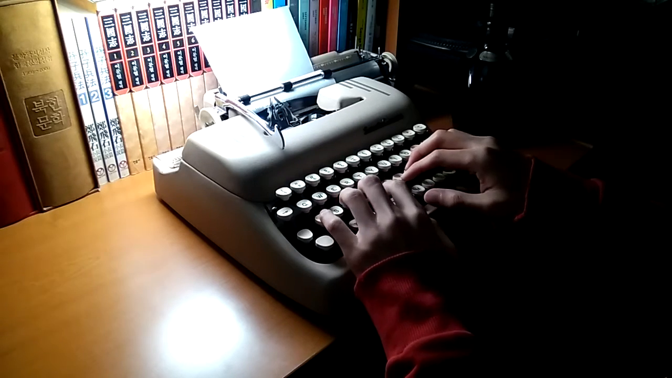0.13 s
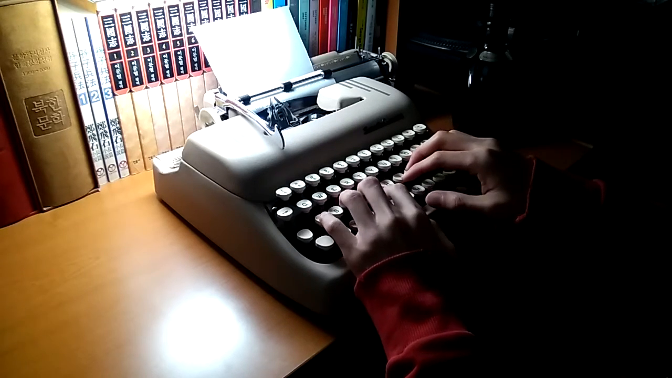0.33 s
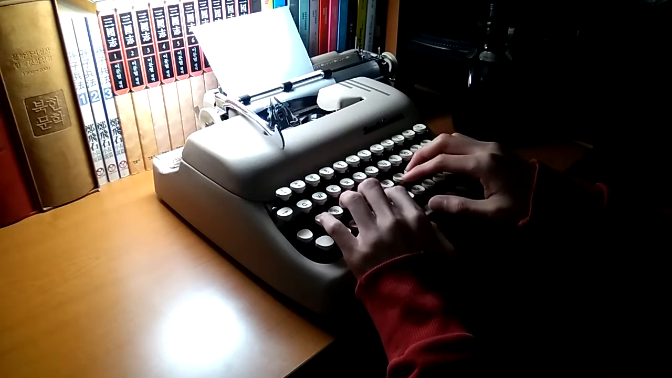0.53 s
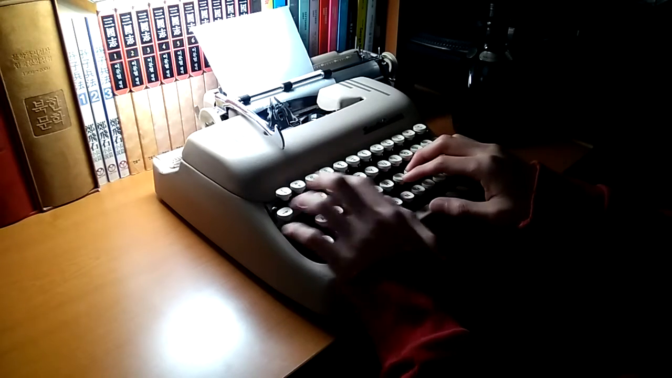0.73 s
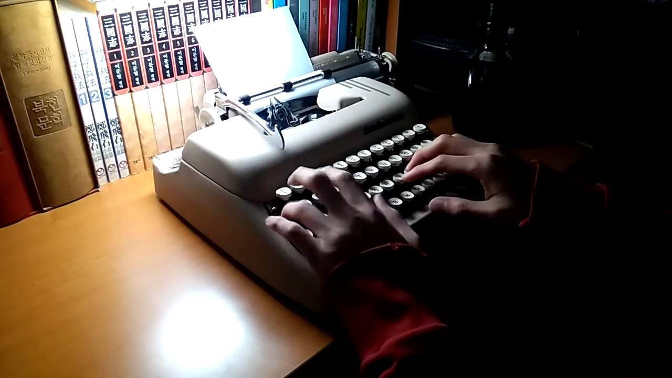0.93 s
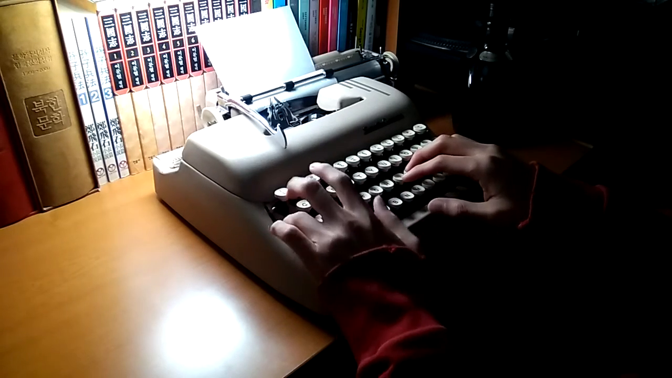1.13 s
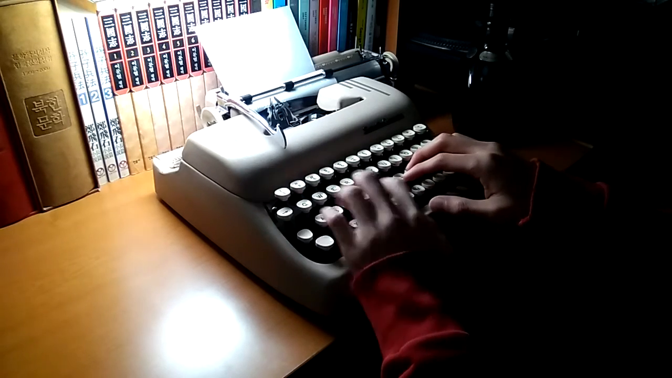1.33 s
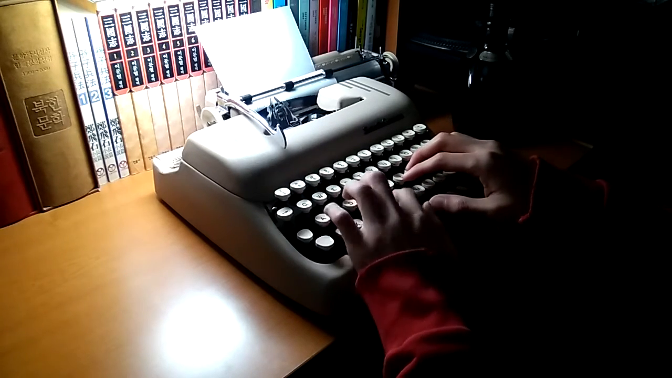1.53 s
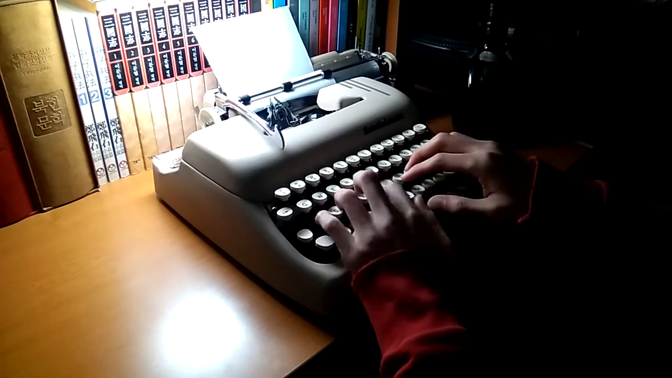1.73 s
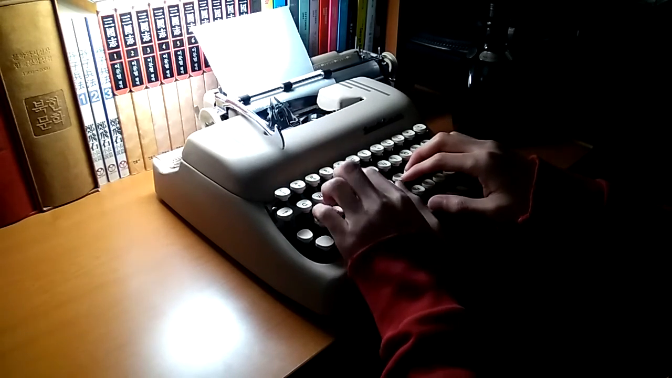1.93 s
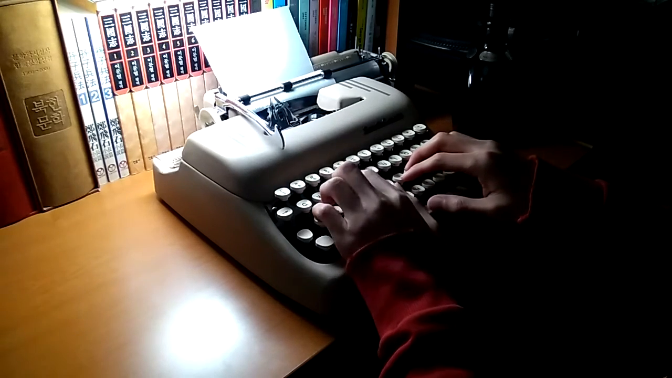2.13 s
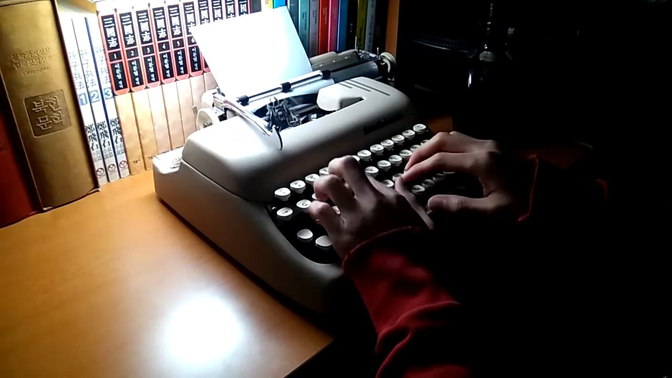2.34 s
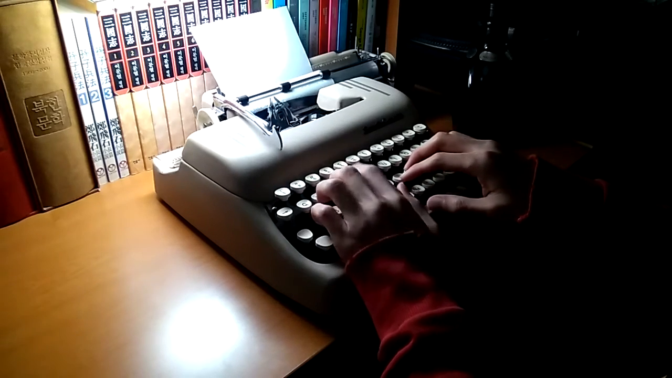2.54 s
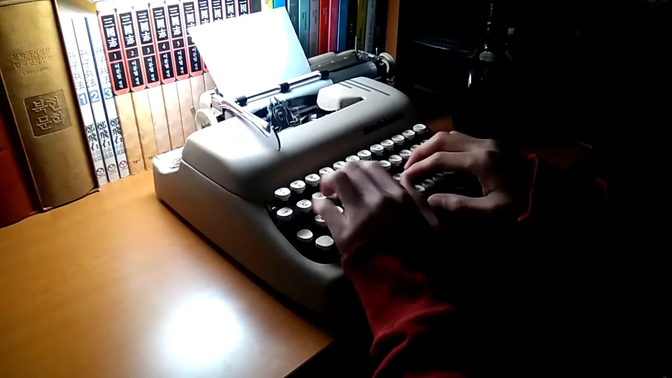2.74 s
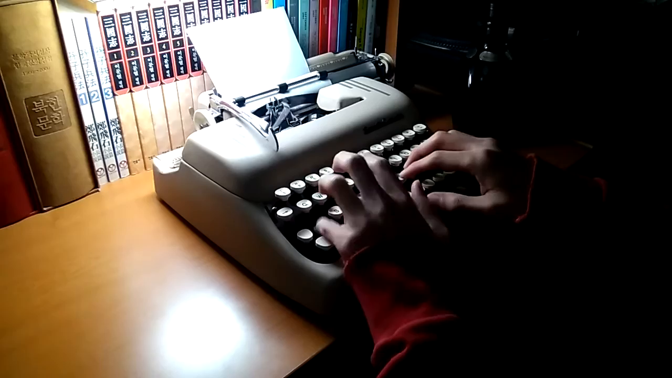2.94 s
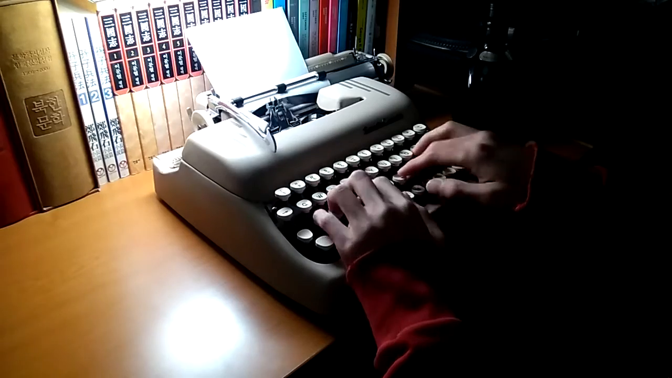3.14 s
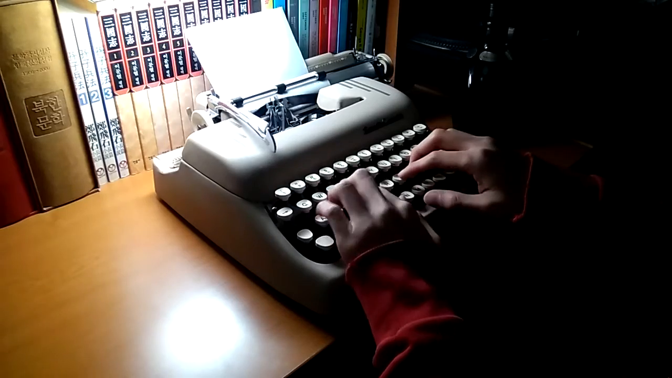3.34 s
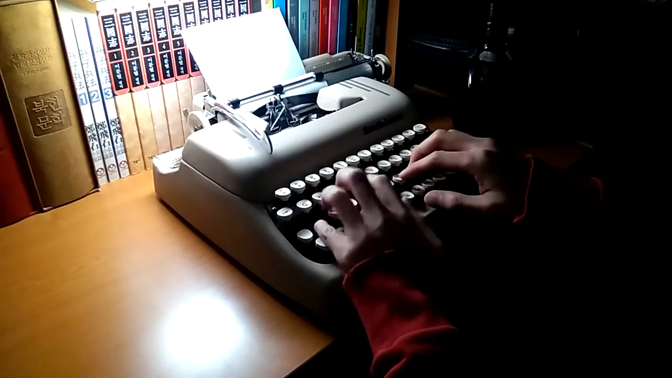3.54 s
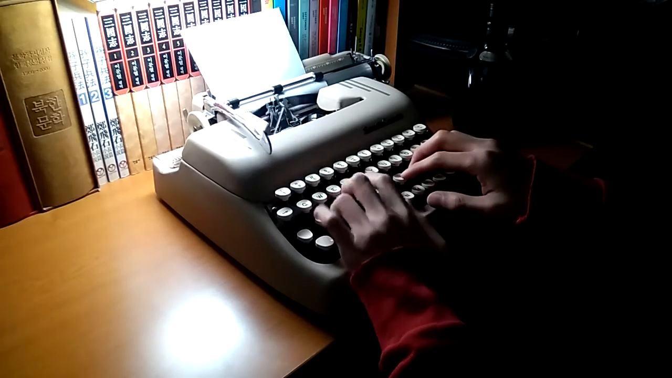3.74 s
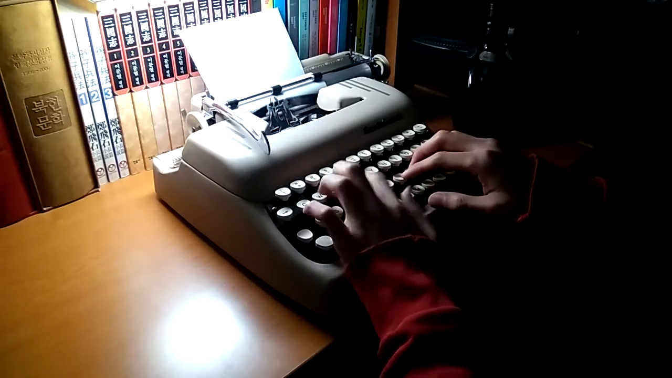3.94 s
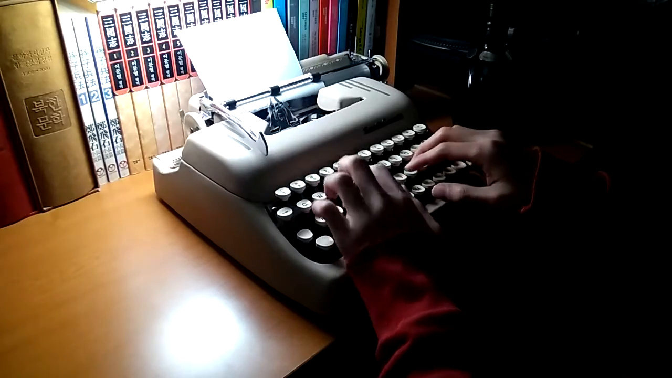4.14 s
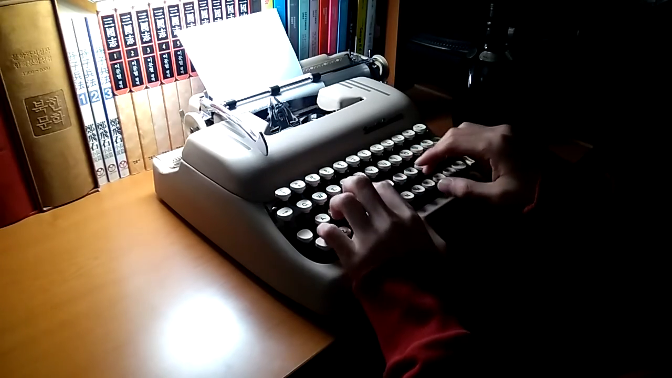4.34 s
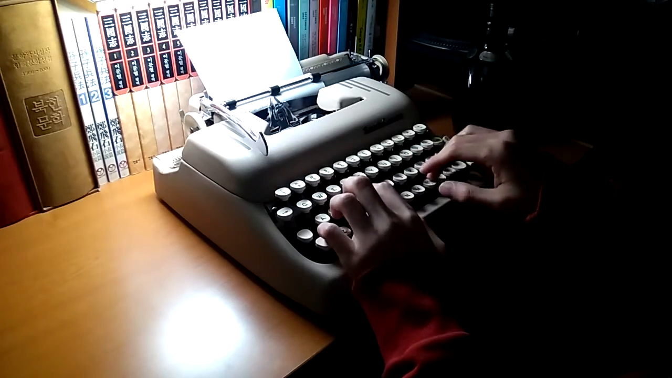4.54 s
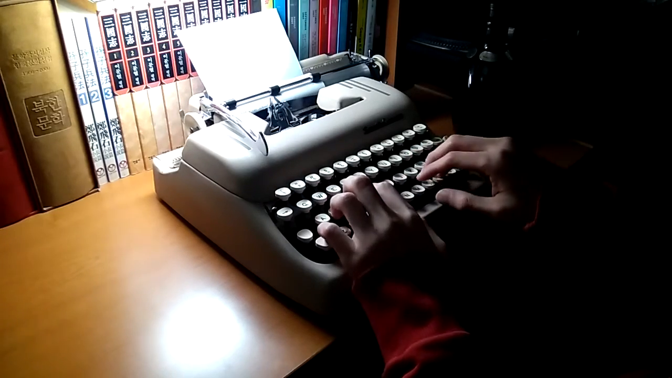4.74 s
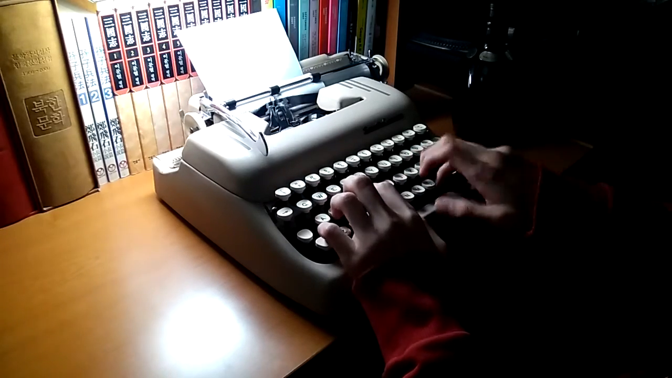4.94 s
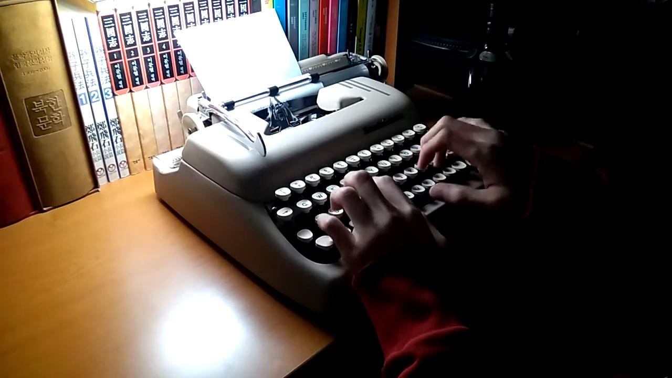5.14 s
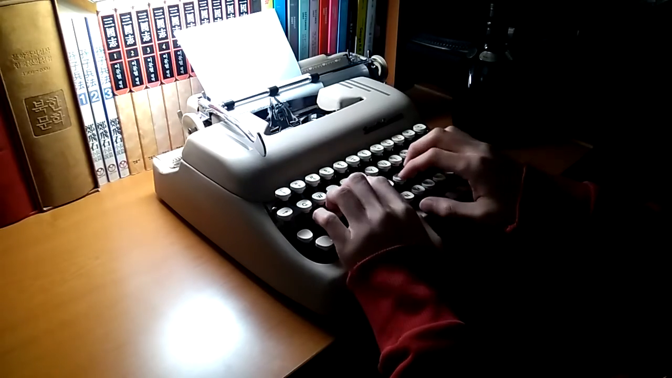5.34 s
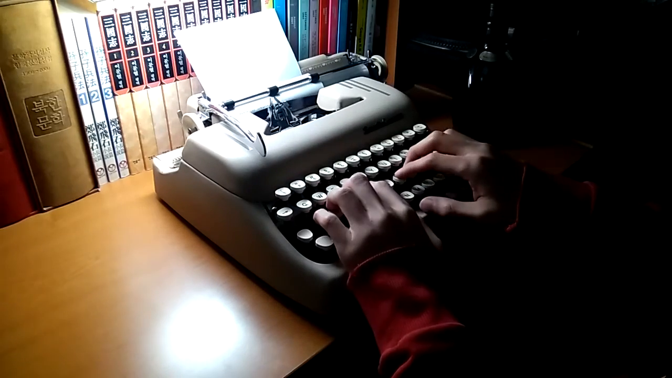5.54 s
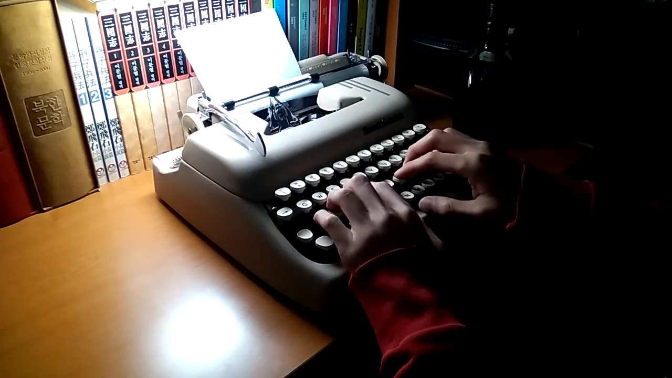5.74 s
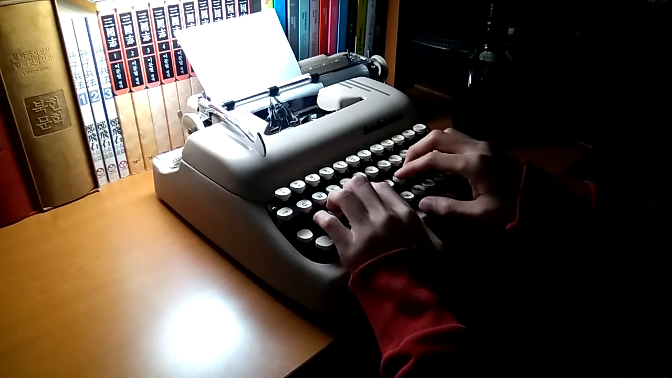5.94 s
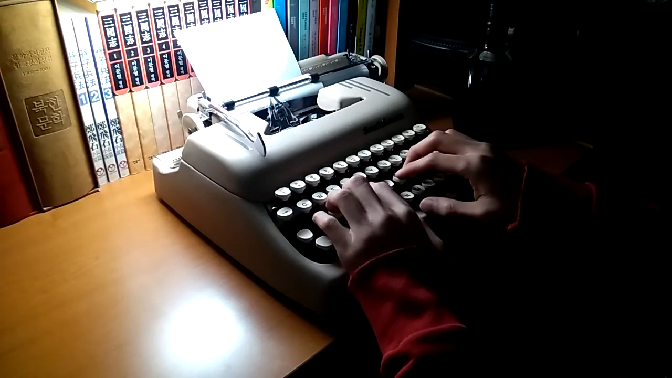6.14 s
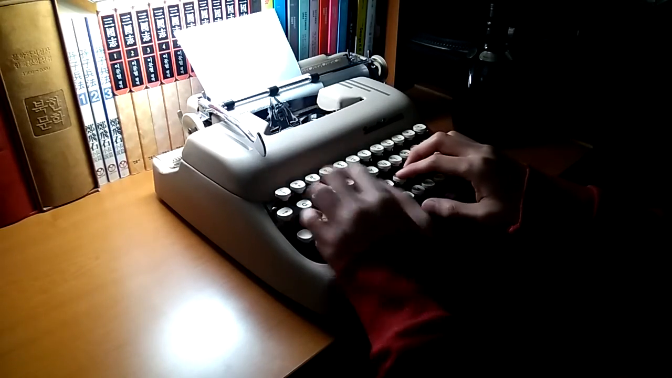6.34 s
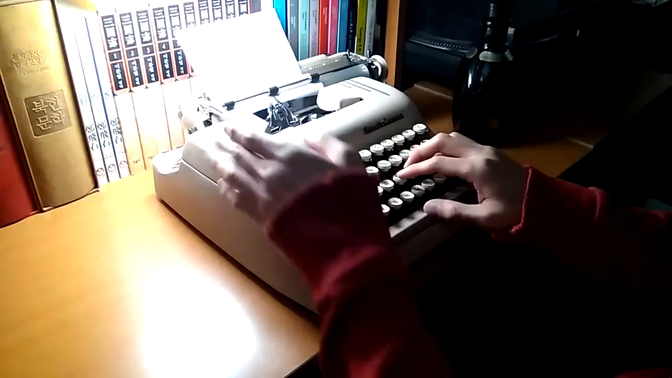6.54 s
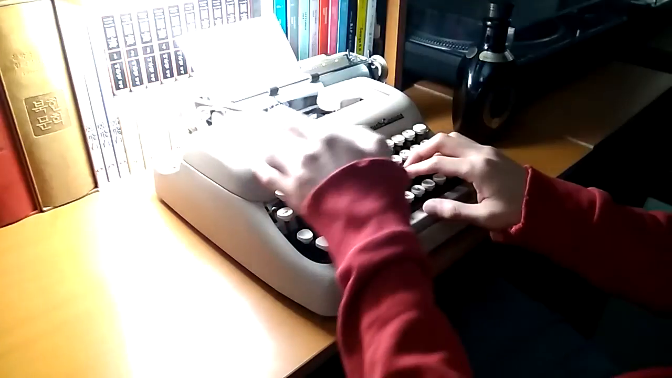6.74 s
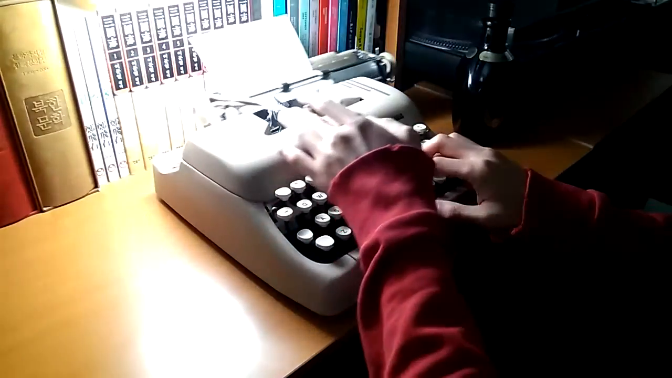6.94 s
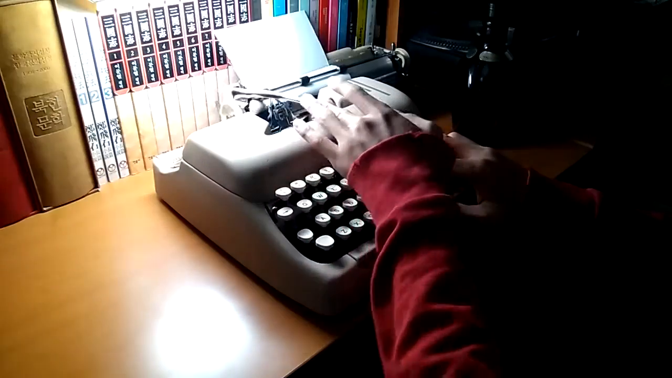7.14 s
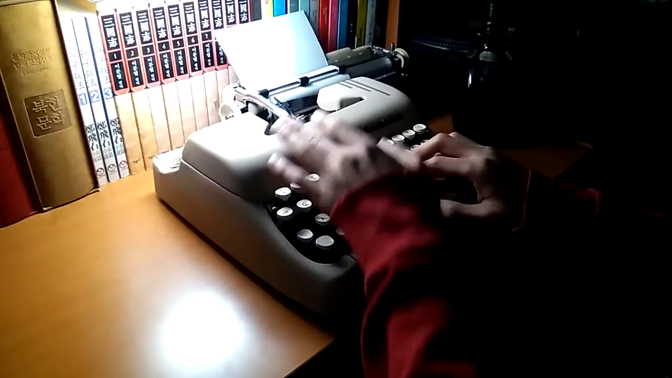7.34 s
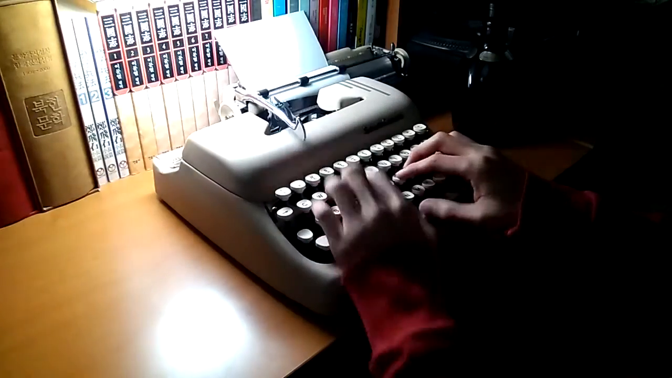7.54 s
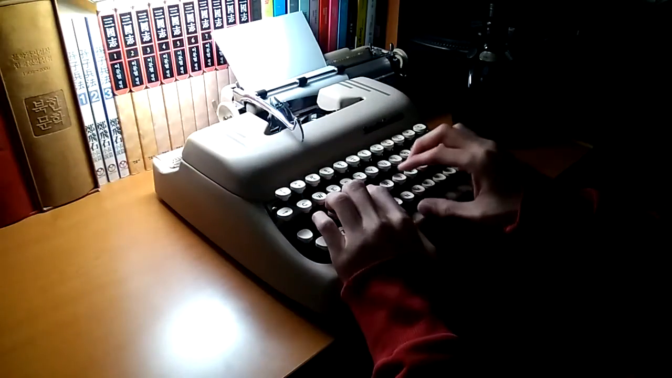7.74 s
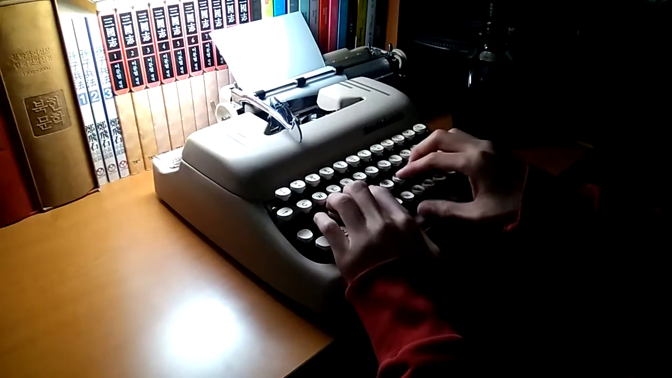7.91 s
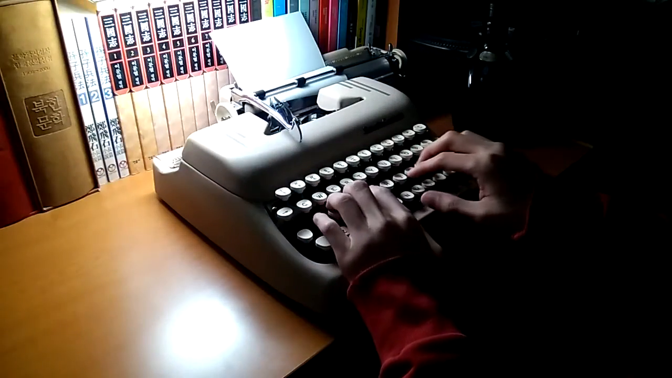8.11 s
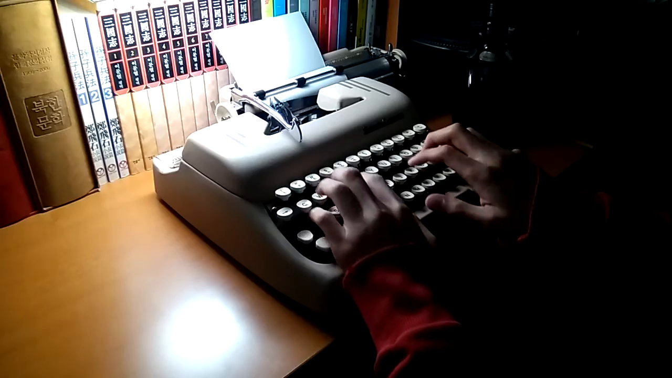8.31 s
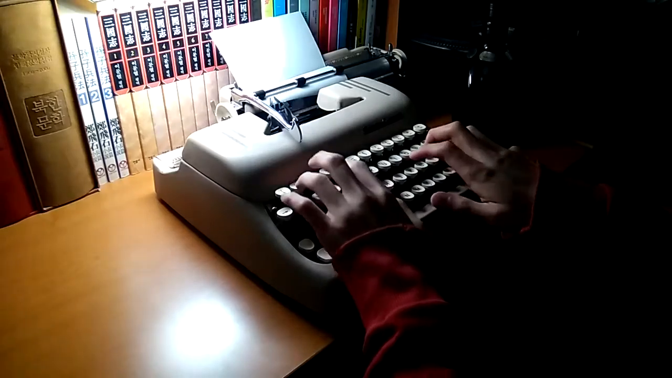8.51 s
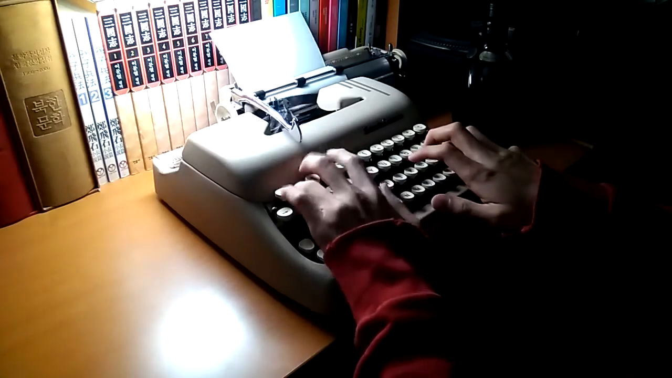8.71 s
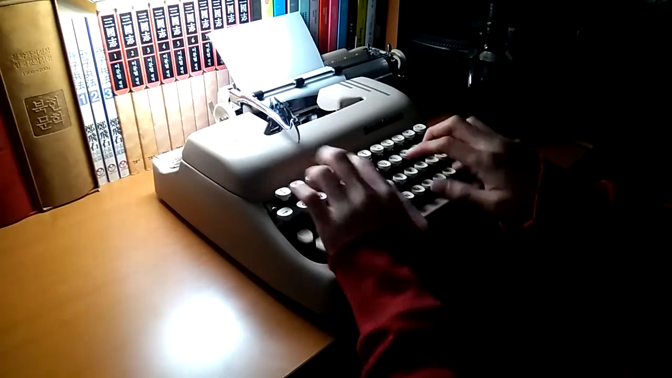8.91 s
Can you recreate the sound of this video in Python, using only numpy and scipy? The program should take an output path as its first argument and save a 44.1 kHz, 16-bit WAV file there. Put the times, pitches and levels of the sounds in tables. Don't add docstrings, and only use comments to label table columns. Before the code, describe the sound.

A manual typewriter on a wooden desk, heard close and thin in a small quiet room. After a near-silent start, metallic clunks lead into about a dozen crisp key strikes, each followed by a clack and rattle. A pause, then the carriage zips along its rack and bangs to a stop, more levers clunk, and a final key strikes. Faint fan hum and thin high whistle throughout.

```python
import sys
import numpy as np
from scipy import signal
from scipy.fft import rfft, irfft
from scipy.io import wavfile

SR = 44100
rng = np.random.default_rng(int(sys.argv[2]) if len(sys.argv) > 2 else 0)


def store_wav(level_fs):
    pcm = np.round(np.clip(np.atleast_2d(level_fs), -1, 1) * 32767)
    wavfile.write(sys.argv[1], SR, pcm.T.astype(np.int16))


def to_linear_factor(level_db):
    exponent = np.asarray(level_db, float) / 20
    return 10 ** exponent


N = 395577

EDGES = 190 * 2 ** np.arange(0, 6.6, 1 / 3)
CENTRES = np.sqrt(EDGES[1:] * EDGES[:-1])
SPAN = np.arange(round(.25 * SR)) / SR

# [f/Hz, density/dB per Hz]
HUSH = [(32, -92.5), (55, -60), (156, -23), (176, -11.5), (240, -10), (270, -6), (367, -5.5), (394, -15),
        (434, -6), (619, -14.5), (905, -18.5), (1850, -31.5), (7670, -39), (10200, -33.5), (16000, -39)]
# [f/Hz, rms level/dB, unsteadiness/ratio]
HUMS = [(120.5, -84.5, .3), (239.6, -60.5, 1.6), (422.8, -64.5, 3.0), (711, -68.5, 3.9), (9940, -73, .35)]
# [t/s, peak level/dB, ring f/Hz, t60/s]
TOUCHES = [(0.699, -43, 10200, 0.13), (0.7617, -50, 9800, 0.07), (4.6606, -49.5, 11200, 0.07),
           (4.7102, -49, 9900, 0.087), (4.9545, -46, 7600, 0.03), (4.9825, -38, 10200, 0.16),
           (6.4163, -47.5, 10400, 0.19), (6.674, -44, 10100, 0.089), (8.1155, -53, 10900, 0.065),
           (8.1698, -51.5, 9990, 0.076), (8.3477, -43, 10600, 0.061), (8.6178, -50, 9990, 0.07),
           (8.7345, -48, 9990, 0.12)]
# [t/s, peak level/dB, clatter t60/s, weight/dB]
HANDLING = [(0.8976, -25.5, 0.11, -3), (1.0212, -12.5, 0.13, 2.5), (1.14, -16.5, 0.22, 6.5),
            (1.1507, -9, 0.13, -2.5), (1.1665, -17.5, .21, -11), (1.3039, -0.5, .15, -11),
            (6.718, -28, .18, -3), (6.7236, -16, .15, 2), (6.789, -17.5, 0.15, 6.5), (6.84, -14, .17, 4.5),
            (6.9277, -26, 0.38, -4), (7.183, .5, 0.18, -2), (7.3162, -24, 0.17, 8.5),
            (7.3818, -16, 0.11, -6.5), (7.4138, -10, .18, -2.5), (7.645, -21.5, 0.3, 5.5),
            (7.682, -23, .18, -3), (7.6894, -11.5, 0.23, 1.8), (7.7084, -25, 0.23, 6),
            (7.7637, -13.5, .14, 1.5), (7.8464, -23.5, 0.2, 7), (7.8814, -24, .17, -2.5),
            (7.891, -11, 0.15, 0.5), (7.9074, -15, 0.22, 1.7), (7.996, -13, .14, 1.7),
            (8.4138, -30, 0.21, 1), (8.4267, -22, .2, -13), (8.451, -19.5, 0.18, 6.5), (8.485, -22, .21, 2),
            (8.7048, -28, 0.071, -24)]
# [t/s, peak level/dB, f/Hz, t60/s]
PINGS = [(.8984, -33, 9240, 0.037), (1.0231, -16, 6470, 0.033), (1.0879, -27, 4960, .08),
         (1.1654, -20, 9800, .04), (1.3057, -2.5, 10500, 0.04), (1.8235, -10, 10300, .045),
         (2.795, -20.5, 6800, 0.061), (3.1453, -7, 14800, .04), (3.1522, -11, 8670, .04),
         (3.5049, -22.5, 6320, .1), (6.7255, -24, 5700, 0.05), (6.79, -29, 4080, 0.064),
         (7.4135, -7.5, 4730, 0.014), (7.7084, -14.5, 9500, .04), (7.7672, -13.5, 7360, 0.033),
         (7.9069, -10, 9330, .032), (7.998, -17, 7360, 0.045), (8.4158, -27, 6400, 0.06)]
# [t/s, peak level/dB, escapement lead/ms, clatter t60/s, clatter level/dB]
STRIKES = [(1.0883, -8.5, 10.5, 0.14, 0), (1.3102, -9.5, 8.2, 0.19, -4), (1.668, -1, 9.5, 0.25, -7.5),
           (2.3145, -2, 6.4, 0.27, -7), (2.705, -2.5, 6.5, 0.28, -4.5), (2.9079, -0.8, 7.9, 0.29, -7),
           (3.1498, -2.3, 7.2, 0.34, -7), (3.4148, -2, 7.4, 0.3, -6), (3.583, -.5, 6.9, 0.34, -9),
           (3.8115, 0.2, 7.7, 0.21, -6.5), (4.0465, -.4, 10.1, 0.23, -6), (5.0193, -0.4, 7, 0.35, -13),
           (8.7947, -2, 6.3, 0.31, -4.5)]
# [t/s, peak level/dB, clatter t60/s]
LEVERS = [(1.2684, -23, .16), (1.6127, -32.5, .19), (2.2628, -32.5, .5), (2.651, -43, .23),
          (2.6623, -29.5, .24), (3.133, -21, .5), (3.3615, -28.5, .18), (3.3716, -22, .22),
          (4.0047, -19.5, .5), (8.775, -29.5, .21)]
# [t/s, peak level/dB, clatter t60/s]
LIFTS = [(1.285, -18, 0.11), (1.6297, -23, 0.17), (2.2874, -20.5, 0.2), (2.6797, -19.5, 0.12),
         (3.3877, -23.5, .2), (3.5585, -13, 0.24)]
# [t/s, peak level/dB, clatter t60/s]
DROPS = [(1.7174, -14, .16), (2.3626, -12, .13), (2.7748, -12.5, .18), (3.5019, -19, .5),
         (3.8616, -13.5, .16), (4.0974, -14.5, .11), (5.028, -10, .18), (5.0553, -15, .18),
         (5.0704, -21, .18)]
# [t/s, peak level/dB, clatter t60/s]
FALLS = [(1.7614, -24, 0.21), (1.7733, -12, .12), (2.4113, -14.5, 0.15), (3.0258, -13, .15),
         (3.2325, -15, 0.094), (3.681, -15, 0.11), (3.9086, -14, 0.14), (4.1465, -13.5, 0.13),
         (5.1157, -13.5, 0.14), (8.9266, -14, 0.15)]
# [t/s, peak level/dB, clatter t60/s]
STOPS = [(3.0845, -10.5, 0.24), (3.745, -11.5, 0.18), (4.206, -10, .18), (5.1657, -14, .18),
         (1.8203, -10.5, .2), (2.4634, -11, .19), (2.8406, -11, .17), (3.2888, -11, .15),
         (3.9659, -13, 0.19)]
# [its knocks, (bass/dB, middle/dB, upper middle/dB, desk jolt/dB)]
STAGES = [
    (LEVERS, (-17, -21.5, -15, -67)),
    (LIFTS, (-26, -17, -13.5, -67.5)),
    (DROPS, (-19.5, -19, -16.5, -73.5)),
    (FALLS, (-21, -22, -7.5, -57)),
    (STOPS, (-21.5, -25, -18.5, -54.5)),
]
# [its knocks, (f/Hz, level/dB, lag/s, t60/s)]
SPRINGS = [
    (LIFTS, (11300, -4, .001, .06)),
    (DROPS, (9700, -9, .001, .04)),
    (FALLS, (6310, -14, .002, .07)),
    (STOPS[4:], (11400, -14, -.015, .09)),
]
# [f/Hz, density/dB per Hz]
METAL = [(3530, -31), (6000, 1), (7560, -1.5), (10000, 3.5), (12800, -3), (15200, -4), (15800, -11)]
# [f/Hz, width/Hz, level/dB]
FRAME = [(2211, 45, -5.5), (3170, 33, -4), (3720, 110, -9.5), (4510, 39, 4), (4870, 8.7, -10),
         (5780, 22, 14.5), (6560, 150, -9.5), (7020, 33, -8), (7300, 34, -11), (8130, 100, -10),
         (9100, 23, 3), (8940, 36, -10), (9660, 20, 10.5), (10300, 100, 6.5), (10400, 24, 4.5),
         (11200, 130, -6.5), (11200, 38, -9), (12100, 100, -11), (12500, 23, -2), (13300, 15, -6.5),
         (13500, 29, -1), (14190, 110, 10.5)]
# [f/Hz, level/dB, t60/s]
PLATEN = [(877, -32, 0.048), (1132, -35, 0.052), (1925, -23.5, 0.03), (2253, -29, 0.083),
          (2990, -32, 0.032), (4665, -16.5, 0.025), (5320, -19.5, .03)]
# [t/s, level/dB, teeth per s]
RUN = [(6.928, -38, 48), (6.93, -34.5, 38), (7.001, -29.5, 72), (7.064, -28, 120), (7.174, -28.5, 104),
       (7.185, -21, 100)]
# [f/Hz, density/dB per Hz]
RAILS = [(590, -13.5), (1000, -13), (2780, -16), (3050, -16.5), (4410, -10.5), (6700, -9.5), (7270, -4),
         (11400, -4), (16000, -13.5)]
# [f/Hz, width/Hz, level/dB]
RACK = [(7300, 140, -2), (8800, 47, 8.5), (11700, 72, 9)]
# [f/Hz, level/dB, t60/s]
MARGIN = [(307, 4, 0.22), (417, 1, 0.53), (810, -8, 0.37), (1330, 3.5, 0.18), (1992, -10, 0.21),
          (2260, -10, 0.19)]


def rms_one(x):
    return x / np.sqrt(np.mean(x ** 2) + 1e-20)


def at_hz(points, hz):
    points = np.array(points)
    return np.interp(np.log(hz), np.log(points[:, 0]), points[:, 1])


def add(out, s, piece):
    i = round(s * SR)
    out[..., i:i + piece.shape[-1]] += piece[..., :N - i]


def band(x, low_hz, high_hz):
    return signal.sosfilt(signal.butter(2, [low_hz, high_hz], "band", fs=SR, output="sos"), x)


def resonance(x, hz, width_hz):
    r = np.exp(-np.pi * width_hz / SR)
    poles = [1, -2 * r * np.cos(2 * np.pi * hz / SR), r * r]
    return signal.lfilter(np.array([1, 0, -1]) * (1 - r * r) / 2, poles, x)


def ping(hz, t60):
    t = SPAN[:round(t60 * SR)]
    tone = np.sin(2 * np.pi * hz * t + rng.uniform(0, 2 * np.pi))
    return tone * to_linear_factor(-60 * t / t60) * (1 - np.exp(-t / 0.00025))


def colour(bass_db, middle_db, upper_db, scatter_db=1.2):
    treble_db = at_hz(METAL, np.maximum(CENTRES, 6000)) - 9
    own = [(200, bass_db + 7.5), (800, bass_db + 11.5), (2600, middle_db + 4.5),
           (6000, upper_db), (8500, treble_db[0])]
    scatter = scatter_db * rng.standard_normal(len(CENTRES))
    return to_linear_factor(np.where(CENTRES > 8500, treble_db, at_hz(own, CENTRES)) + scatter)[:, None]


def dying(t60, rise_s):
    slower = (CENTRES[:, None] / 8000) ** -.08
    return to_linear_factor(-60 * SPAN / (t60 * slower)) * (1 - np.exp(-SPAN / (rise_s * slower ** 3)))


def contacts():
    knocks = []
    for rows, (bass, middle, upper, jolt) in STAGES:
        knocks += [(s, db, t60, bass, middle, upper, db + jolt) for s, db, t60 in rows]
    for s, db, t60, weight in HANDLING:
        knocks.append((s, db, t60, weight - 23.5, weight - 20.5, .4 * weight - 12, db + weight - 54))
    return knocks


def room_tone():
    hz = np.maximum(np.fft.rfftfreq(N, 1 / SR), 1)
    noise = rfft(rng.standard_normal(N))
    out = to_linear_factor(-52.5) * rms_one(irfft(noise * to_linear_factor(at_hz(HUSH, hz)), N))
    for hum_hz, db, unsteady in HUMS:
        narrow = resonance(rng.standard_normal(N), hum_hz, 12)
        wavering = rms_one(resonance(narrow, hum_hz, 12))
        steady = np.sqrt(2) * np.sin(2 * np.pi * hum_hz * np.arange(N) / SR)
        out += to_linear_factor(db) * rms_one(steady + unsteady * wavering)
    return out


def touches(power, rings):
    for s, db, hz, t60 in TOUCHES:
        shade = colour(-39.5, -21.5, -13.5, scatter_db=2.4)
        add(power, s, (to_linear_factor(db - 7.5) * shade * dying(t60, .0006)) ** 2)
        add(rings, s, to_linear_factor(db - 5.5) * ping(hz, .03))


def linkage(power):
    click = dying(0.022, 0.0005) ** 2
    for s, db, t60, bass_db, middle_db, upper_db, _ in contacts():
        shade = (to_linear_factor(db - 10) * colour(bass_db, middle_db, upper_db)) ** 2
        add(power, s, shade * (click + (to_linear_factor(-5) * dying(t60, 0.0028)) ** 2))


def links_and_springs(rings):
    ringing = list(PINGS)
    for rows, (hz, ring_db, lag_s, t60) in SPRINGS:
        ringing += [(s + lag_s, db + ring_db, hz, t60) for s, db, _ in rows]
    for s, db, hz, t60 in ringing:
        add(rings, s, to_linear_factor(db - 8) * ping(hz * rng.normal(1, .01), t60))


def crack():
    pulses = np.zeros(200)
    pulses[[12, 34, 62]] = to_linear_factor([1.5, -2.5, -6.5]) * [1, 1, -1]
    return band(pulses, 2000, 15500)


def strikes(power, rings):
    trip, slap = dying(.12, .0005) ** 2, dying(.018, .0004) ** 2
    for s, db, lead_ms, t60, clatter_db in STRIKES:
        shade = (to_linear_factor(db - 11.5) * colour(-28, -19.5, -11.5)) ** 2
        rattle = (to_linear_factor(clatter_db) * dying(t60, 0.0038)) ** 2
        add(power, s, shade * (to_linear_factor(2 * 3) * slap + rattle))
        add(power, s - lead_ms / 1000, shade * to_linear_factor(-13.5) * trip)
        add(rings, s, to_linear_factor(db + 2) * crack())
        add(rings, s + .001, to_linear_factor(db - 17) * ping(6420 * rng.normal(1, .01), .02))


def grains(count, share, spread_db):
    size_db = spread_db * np.minimum(rng.exponential(1, N), 3)
    hits = (rng.random(N) < share) * to_linear_factor(size_db)
    hits = signal.lfilter([1], [1, -.9], hits)
    return rms_one(rng.standard_normal((count, N)) * (1 + hits))


def clatter(power):
    white, out = grains(count=2, share=0.0091, spread_db=-1.5), 0
    for k, (low, high) in enumerate(zip(EDGES, EDGES[1:])):
        shaken = white[k % 2] * np.sqrt(power[k]) + 1e-18
        out = out + band(shaken, low, high)
    return to_linear_factor(12) * out


def frame(power):
    out = np.zeros(N)
    for hz, width_hz, db in FRAME:
        shaking = np.sqrt(power[np.searchsorted(EDGES, hz) - 1])
        taps = (rng.random(N) < 90 / SR) * to_linear_factor(3.4 * rng.standard_normal(N))
        r = np.exp(-np.pi * max(1.5 * width_hz, 70) / SR)
        w = 2 * np.pi * hz / SR
        rung = signal.lfilter([0, np.sin(w)], [1, -2 * r * np.cos(w), r * r], taps * shaking + 1e-18)
        out += to_linear_factor(np.clip(db, -6, 0)) * rung
    return to_linear_factor(2) * out


def ticks(power):
    shaking = np.sqrt(power[CENTRES > 4000].mean(axis=0))
    hits = rng.random(N) < 260 / SR
    hits = hits * to_linear_factor(10 + 2.9 * rng.standard_normal(N)) * rng.choice([-1, 1], N)
    return to_linear_factor(11) * band(hits * shaking + 1e-18, 2500, 12000)


def bodies():
    out, blows = np.zeros(N), []
    for s, db, *_ in contacts():
        woken = [FRAME[k][0] for k in rng.permutation(len(FRAME))[:5]]
        blows.append((s, db, [(hz, at_hz(METAL, hz) - 19, .03) for hz in woken]))
    blows += [(s, db, PLATEN) for s, db, *_ in STRIKES]
    blows.append((7.182, -38.5, MARGIN))
    for s, db, modes in blows:
        for hz, mode_db, t60 in modes:
            note = ping(hz * rng.normal(1, .015), min(t60, .3))
            add(out, s, to_linear_factor(db + mode_db + rng.normal(0, 0.67)) * note)
    return out


def desk():
    push, tap = np.full(N, 1e-18), np.full(N, 1e-18)
    jolts = [(s - .0066, db - 62) for s, db, *_ in STRIKES]
    jolts += [(row[0], row[-1]) for row in contacts()]
    for s, db in jolts:
        add(push, s, to_linear_factor(db - 5 + rng.normal(0, 4)) * np.hanning(160))
        add(tap, s, to_linear_factor(db + 18.5) * np.hanning(60))
    panel = resonance(tap, 200, 60) + resonance(tap, 220, 70)
    return to_linear_factor(8.5) * resonance(push, 95, 140) + to_linear_factor(10) * panel


def carriage():
    s, db, per_s = np.transpose(RUN)
    t = np.arange(N) / SR
    tooth = np.cumsum(np.interp(t, s, per_s, left=0)) / SR % 1
    hiss = rng.standard_normal(N) * (0.4 + 0.7 * np.exp(-tooth / .25))
    hiss = irfft(rfft(hiss) * to_linear_factor(at_hz(RAILS, np.fft.rfftfreq(N, 1 / SR) + 1)), N)
    song = sum(to_linear_factor(mode_db) * resonance(hiss, hz, width_hz) for hz, width_hz, mode_db in RACK)
    hiss = hiss + to_linear_factor(-1) * song * np.interp(t, [s[0], s[-1]], [.2, 1.2])
    return rms_one(hiss) * to_linear_factor(np.interp(t, s, db, left=-150, right=-150))


def scene():
    power, rings = np.zeros((len(CENTRES), N)), np.zeros(N)
    touches(power, rings)
    linkage(power)
    links_and_springs(rings)
    strikes(power, rings)
    metal = clatter(power) + rings + frame(power) + ticks(power) + bodies() + carriage()
    machine = signal.sosfilt(signal.butter(2, 190, "high", fs=SR, output="sos"), metal)
    return (machine + desk() + room_tone())[None]


def band_limit(x):
    return signal.sosfilt(signal.butter(12, 16970, fs=SR, output="sos"), x)


def record(dry):
    rounded = 2 * np.tanh(dry / 2)
    top_cut = signal.ellip(10, .5, 36, 15850, fs=SR, output="sos")
    return band_limit(signal.sosfilt(top_cut, rounded))


dry = scene()
out = record(dry)
store_wav(out)
```